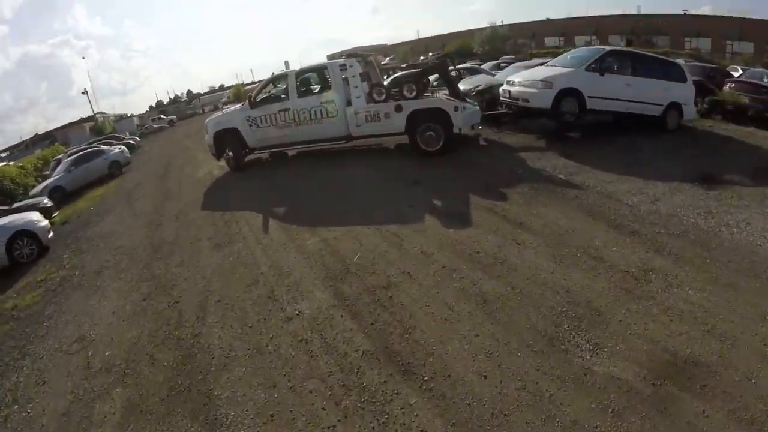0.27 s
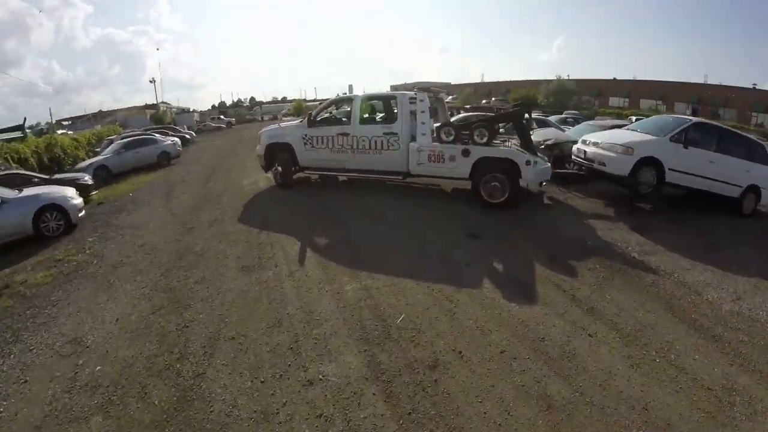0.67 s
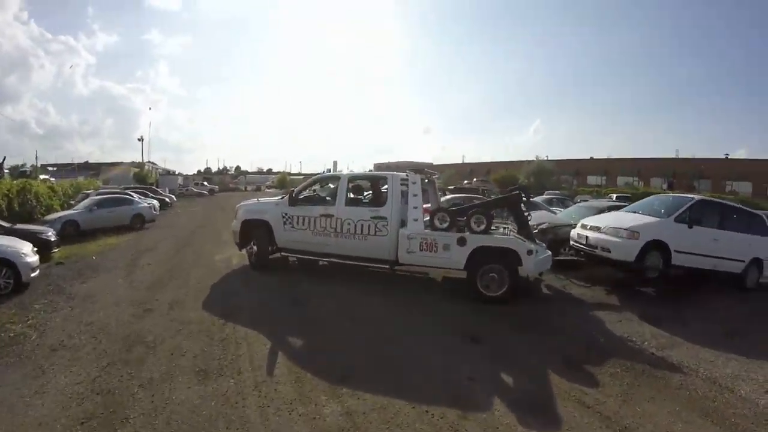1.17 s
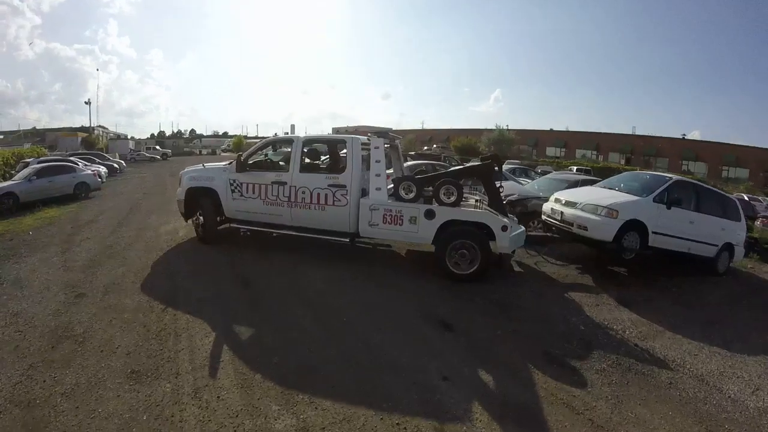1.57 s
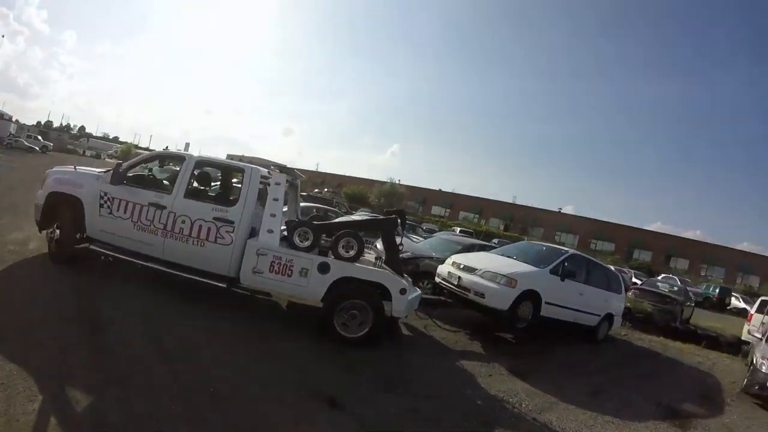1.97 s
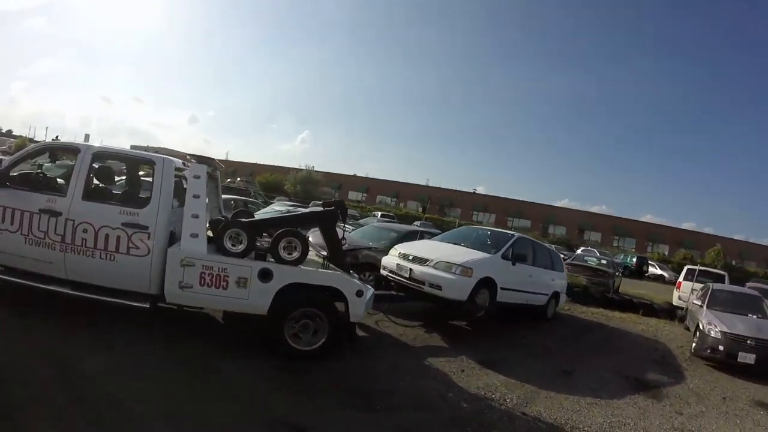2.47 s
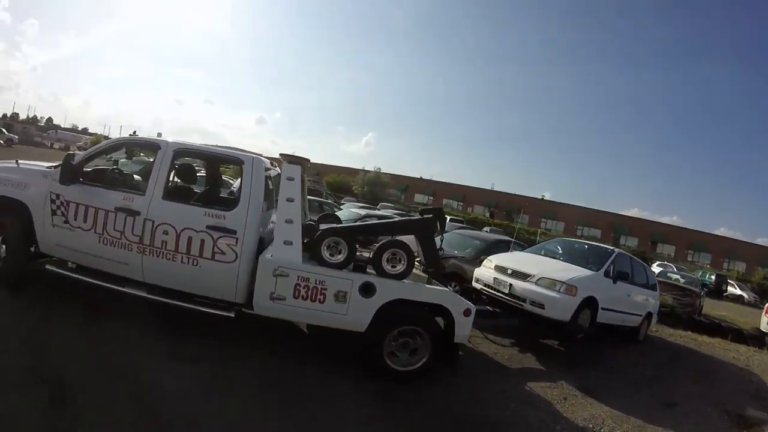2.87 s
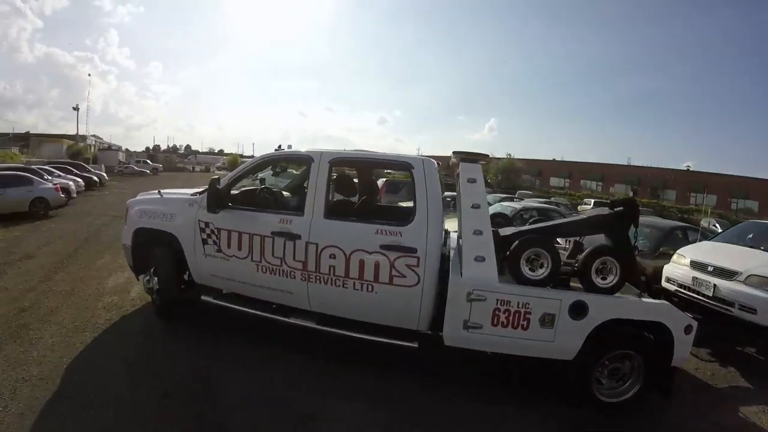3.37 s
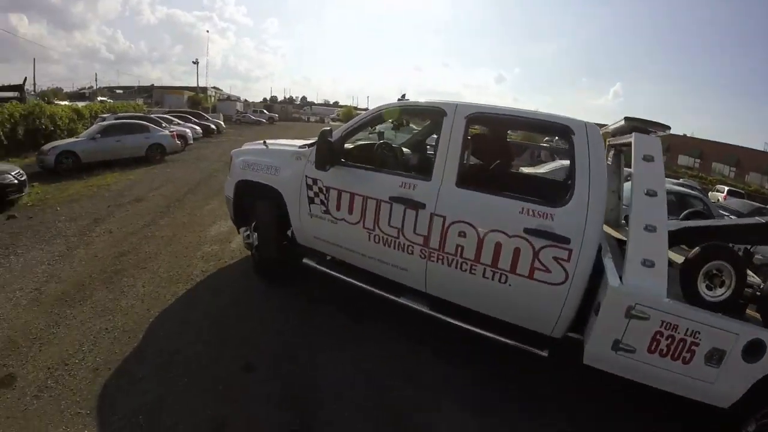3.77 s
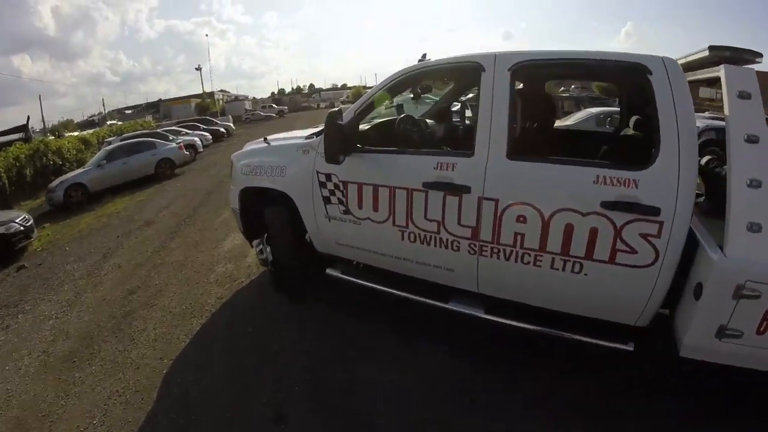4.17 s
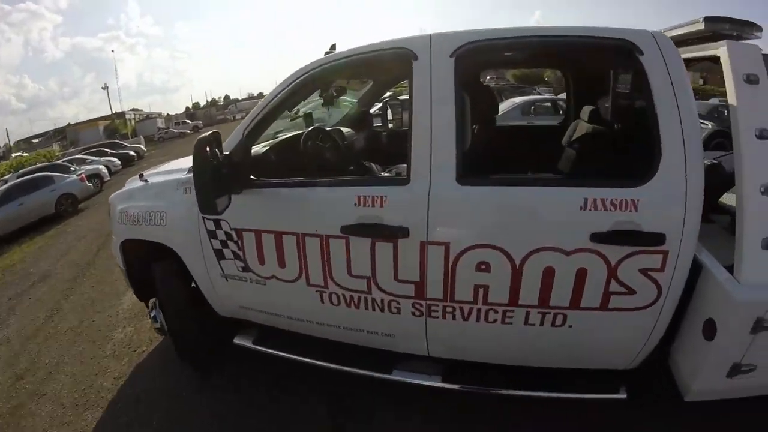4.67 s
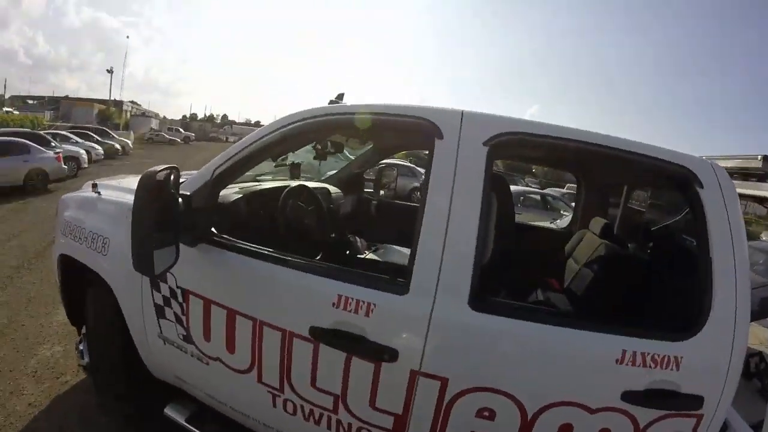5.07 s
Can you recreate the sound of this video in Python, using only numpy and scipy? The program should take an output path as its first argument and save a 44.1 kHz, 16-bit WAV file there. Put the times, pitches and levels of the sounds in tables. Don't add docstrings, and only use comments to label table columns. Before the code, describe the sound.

Outdoors in an open gravel lot, a chest-worn microphone thumps deeply with every footstep, about two a second. Faint stone crunches and tiny cracks sit beneath. A diesel truck idles ahead with a fast, ragged knock that grows louder and brighter as the walker nears. A brief airy hiss swells around two and a half seconds, over distant traffic hum.

```python
import sys
import numpy as np
from scipy import signal
from scipy.fft import rfft, irfft, next_fast_len
from scipy.io import wavfile
from scipy.ndimage import uniform_filter1d

SR = 44100
rng = np.random.default_rng(int(sys.argv[2]) if len(sys.argv) > 2 else 0)


def level_to_linear(level):
    exponent = np.asarray(level, float) / 20
    return 10 ** exponent


def wav_record(signal):
    frames = np.transpose(np.atleast_2d(signal))
    bounded = np.clip(frames, -1, 1)
    quanta = np.round(bounded * 32767).astype(np.int16)
    wavfile.write(sys.argv[1], SR, quanta)


N = 234964
T = np.arange(N) / SR

# t/s, peak level/dB, swing f/Hz, spread/s
JOLTS = [(0.387, -24, 20.2, 0.022), (0.436, -24, 33.4, 0.022), (0.471, -33.5, 49, 0.019),
         (0.893, -25.5, 52, 0.011), (0.922, -23, 24, 0.025), (0.961, -29, 42, 0.012),
         (1.0, -33.5, 34, 0.02), (1.468, -17, 34.5, 0.010), (1.514, -24.5, 27, 0.019),
         (1.55, -31, 46, 0.02), (2.018, -22.5, 30, 0.011), (2.068, -30.5, 53, 0.013),
         (2.102, -33, 22, 0.011), (2.491, -26.5, 41.8, 0.028), (2.552, -28.5, 55, 0.0073),
         (2.619, -27, 41.5, 0.023), (2.654, -23, 30, 0.006), (3.047, -25, 39, 0.0088),
         (3.105, -20.5, 26, 0.036), (3.141, -25.5, 48, 0.013), (3.622, -31.5, 57, 0.017),
         (3.652, -27, 42.6, 0.023), (3.733, -34.5, 23, 0.026), (4.206, -23, 29, 0.0087),
         (4.249, -24, 32, 0.014), (4.29, -35, 30, 0.026), (4.738, -31, 58, 0.017),
         (4.767, -33, 25.3, 0.053), (4.864, -27, 29.6, 0.013)]
# t/s, peak level/dB, swing f/Hz
TAPS = [(0.757, -34.5, 28.7), (1.171, -43, 53.3), (1.854, -39, 30), (2.395, -38, 43), (2.946, -32, 37.6),
        (3.377, -31, 64), (3.496, -38, 49.6), (4.156, -32, 28), (4.431, -31.5, 61.6), (5.052, -50, 38),
        (5.154, -36.5, 50), (5.305, -37.5, 53.7)]
# f/Hz, level/dB per Hz
SWAY_COLOUR = [(4, 1), (12, 2.5), (25, 7), (45, 1.5), (62, 7), (78, -16), (95, -31), (130, -60), (250, -92)]
# t/s, level/dB, length/s, centre f/Hz
CRUNCHES = [
    (0.349, -56, 0.03, 1100),
    (0.885, -56, 0.05, 1000),
    (1.452, -63, 0.076, 1500),
    (1.997, -65, 0.05, 1500),
    (2.457, -55.5, 0.043, 990),
    (3.058, -60, 0.066, 1500),
    (3.354, -59, 0.023, 810),
    (3.631, -64, 0.047, 1500),
    (4.196, -62, 0.12, 1480),
    (4.678, -57, 0.029, 1400),
]
# t/s, peak level/dB, f/Hz
CRACKS = [
    (.37, -43, 1300),
    (.898, -38, 1600),
    (.92, -46, 1000),
    (.934, -40, 1300),
    (2.465, -45, 1200),
    (2.49, -46, 900),
    (4.706, -37, 1500),
]
# level at 5 m/dB, hidden level/dB, shows at t/s, takes/s, hides at t/s
PARTS = [
    (-53.5, -6.5, 1.94, 0.43, 5),
    (-51.5, -8, 3.56, 0.074, 4.88),
    (-54, -2, 1.34, 0.1, 5),
    (-66, -5, 1.95, .2, 3.65),
]
# f/Hz, width/Hz, level/dB
SUMP_RINGS = [(1166, 102, -10), (1315, 110, -13), (1525, 71, -3), (1572, 45, -1), (1736, 286, -11)]
BLOCK_RINGS = [(1903, 60, 0), (2056, 210, -7.5), (2130, 116, -2.5), (2214, 160, 1), (2747, 310, -8.5),
               (3780, 460, -12), (7500, 1700, -30.5)]
HEAD_RINGS = [(2480, 69, 2), (2880, 340, -4), (3130, 150, 2.5), (3303, 300, -1.5), (3410, 110, -5.5),
              (3840, 400, -9.5), (4650, 540, -20.5)]
PUMP_RINGS = [(6225, 470, 0.5), (7950, 1360, -17)]
# sump level/dB, block level/dB, head level/dB, pump level/dB
CYLINDERS = [(-4.5, -1, -1, -1), (-4.5, 0, -1.5, -1), (0, 0, -1.5, -1), (-1.5, -2, -1, 0),
             (-3.5, -3, 0, -1), (-7, -2.5, 0, -2), (-5.5, -3.5, -2.5, -4.5), (-4, -3, -3, -1)]
# t/s, level/dB
AIR = [
    (1.9, -71),
    (2.15, -58),
    (2.3, -57.5),
    (2.52, -54),
    (2.6, -64),
    (2.9, -73),
]
# f/Hz, level/dB per Hz
AIR_COLOUR = [(1200, -32), (1750, -1), (2100, -33), (2900, -16), (3300, 1), (3500, -4), (3620, -33),
              (5000, -50)]
# f/Hz, level/dB per Hz
LOT_COLOUR = [(45, -34), (70, -1.5), (130, -6), (250, -8.5), (500, -13), (850, -16.5), (1400, -14.5),
              (2400, -18), (3400, -17.5), (4300, -27.5), (6000, -32), (9000, -36.5), (12300, -43),
              (15500, -46)]
TOP_DROPOUTS = [
    .385,
    .91,
    4.245,
]

FIRING_HZ, FIRST_FIRING_S = 42.865, -0.0065
START_M, WALK_M_S = 8.78, 0.97


def level(x, db):
    return x * level_to_linear(db) / np.sqrt(np.mean(x ** 2))


def ring(x, hz, width_hz):
    return signal.lfilter(*signal.iirpeak(hz, hz / width_hz, fs=SR), x)


def coloured(colour):
    size = next_fast_len(N)
    hz = np.arange(size // 2 + 1) * SR / size
    points_hz, points_db = np.transpose(colour)
    gain = level_to_linear(np.interp(np.log(np.maximum(hz, 1)), np.log(points_hz), points_db))
    return irfft(rfft(rng.standard_normal(size)) * gain, size)[:N]


def wander(rate_hz):
    hold = int(SR / rate_hz)
    steps = np.repeat(rng.standard_normal(N // hold + 1), hold)
    return 0.69 * uniform_filter1d(uniform_filter1d(steps, hold), hold)[:N]


def add(out, s, piece):
    i = int(s * SR)
    out[i:i + len(piece)] += piece[:N - i]


def turn_on(s, span_s):
    return 1 / (1 + np.exp(-(T - s) / span_s))


def panels(x, rings):
    size = next_fast_len(N)
    f = np.arange(size // 2 + 1) * SR / size
    power = sum(level_to_linear(2 * db) / (1 + ((f - hz) / width) ** 2 * 2) ** 2 for hz, width, db in rings)
    cepstrum = irfft(np.log(power) / 2, size)
    cepstrum[1:size // 2] *= 2
    cepstrum[size // 2 + 1:] = 0
    return irfft(rfft(x, size) * np.exp(rfft(cepstrum)), size)[:N]


def mount():
    sway_db = -50.5
    shudder_db, rise_s, fall_s = -17, 0.053, 0.077
    tap_cycles, edge_db, edge_ratio = 0.41, -18, 2.67
    push = 0.24

    power = level_to_linear(2 * sway_db)
    for s, db, *_ in JOLTS:
        shape = np.exp(-2 * np.maximum((s - T) / rise_s, (T - s) / fall_s))
        power = power + level_to_linear(2 * (db + shudder_db)) * shape
    out = level(coloured(SWAY_COLOUR), 0) * np.sqrt(power) * level_to_linear(1.1 * wander(9.6))

    swings = list(JOLTS)
    for s, db, hz in TAPS:
        swings.append((s, db, hz, tap_cycles / hz))
        swings.append((s, db + edge_db, hz * edge_ratio, tap_cycles / hz / edge_ratio ** 0.5))
    t = T[:SR // 2] - 1 / 4
    for s, db, hz, spread_s in swings:
        swing = np.exp(-(t / spread_s) ** 2 / 2) * (push + np.cos(2 * np.pi * hz * t))
        add(out, s - 1 / 4, -level_to_linear(db) * swing)
    return out


def gravel():
    grains_per_s, spread_db, crack_s = 900, 3.5, 0.00089
    out = np.zeros(N)
    for s, db, length_s, hz in CRUNCHES:
        chance, size, sign = rng.random((3, SR // 4))
        grains = (chance < grains_per_s / SR) * level_to_linear(-spread_db * np.log(size)) * np.sign(sign - 0.5)
        crunch = level(ring(ring(grains, hz, 2 * hz), hz, 2 * hz), db)
        t = T[:SR // 4] / length_s
        add(out, s, crunch * 2 * np.e * t * np.exp(-2 * t))
    t = T[:SR // 50]
    for s, db, hz in CRACKS:
        add(out, s, level_to_linear(db) * np.exp(-t / crack_s) * np.sin(2 * np.pi * hz * t))
    return out


def diesel():
    knock_s, rise_s = 0.006, 0.0025
    second_db, second_at = -4, 0.8
    valves_db, scatter_db = -8, 1.0
    blow_db, blow_loss_db, blow_s, jitter_s = 18.5, 7.0, 0.002018, 0.0004

    turn = (T - FIRST_FIRING_S) * FIRING_HZ
    firing = turn.astype(int)
    since_s = (turn - firing) / FIRING_HZ
    late_s = (turn - second_at) % 1 / FIRING_HZ
    knock = 0
    for db, t in ((0, since_s), (second_db, late_s)):
        knock = knock + level_to_linear(db) * (np.exp(-t / knock_s) - np.exp(-t / rise_s))
    scatter, timing = rng.standard_normal((firing[-1] + 1, 2))[firing].T
    blow = (since_s * SR).astype(int) == ((blow_s + jitter_s * timing) * SR).astype(int)
    near_db = -20 * np.log10((START_M - WALK_M_S * T) / 5)
    cylinder_db = np.array(CYLINDERS)[firing % len(CYLINDERS)]

    out = 0
    for k, rings in enumerate((SUMP_RINGS, BLOCK_RINGS, HEAD_RINGS, PUMP_RINGS)):
        strike = level_to_linear(cylinder_db[:, k] + scatter_db * scatter)
        ragged, valves = rng.standard_normal((2, N))
        rattle = strike * (knock * ragged + level_to_linear(blow_db - blow_loss_db * k) * blow + level_to_linear(valves_db) * valves)
        db, hidden_db, shows_s, takes_s, hides_s = PARTS[k]
        seen = turn_on(shows_s, takes_s) * (1 - turn_on(hides_s, takes_s))
        out = out + level(panels(rattle, rings), db + near_db + hidden_db * (1 - seen))
    return out


def air():
    swell_db = np.interp(T, *np.transpose(AIR), left=-120, right=-120)
    return level(coloured(AIR_COLOUR), 0) * level_to_linear(swell_db + 1.8 * wander(31.5))


def lot():
    size = next_fast_len(N)
    hz = np.arange(size // 2 + 1) * SR / size
    hum = rfft(level(coloured(LOT_COLOUR), -54.5), size)
    swell = wander(0.57)
    octaves = np.log2(np.maximum(hz, 60) / 60)
    out = 0
    for octave in range(9):
        share = np.clip(1 - np.abs(octaves - octave), 0, 1)
        flicker = level_to_linear(0.5 * swell + 0.22 * wander(5.67))
        out = out + flicker * irfft(hum * share, size)[:N]
    return out


def scene():
    return (mount() + gravel() + diesel() + air() + lot())[None]


def patchy_top(x):
    edge_hz, top_hz, kept, kept_gain, hole_db = 12800, 15010, 0.55, 1.35, -30
    hz, s, frames = signal.stft(x, SR, nperseg=2048)
    patches = rng.random((len(hz) // 5 + 1, len(s) // 2 + 1)) < kept
    patches = np.repeat(np.repeat(patches, 5, axis=0), 2, axis=1)[:len(hz), :len(s)]
    present = np.abs(s[:, None] - TOP_DROPOUTS).min(axis=1) > 0.024
    gain = np.where(patches, kept_gain, level_to_linear(hole_db)) * present
    gain[hz < edge_hz] = 1
    gain[hz > top_hz] = 0
    return signal.istft(frames * gain, SR)[1][..., :N]


def band_limit(x):
    return signal.sosfilt(signal.butter(12, 15150, fs=SR, output="sos"), x)


def record(dry):
    highpass = signal.butter(2, 5.0, "high", fs=SR, output="sos")
    mix = patchy_top(signal.sosfilt(highpass, dry))
    return band_limit(mix)


dry = scene()
out = record(dry)
wav_record(out)
```